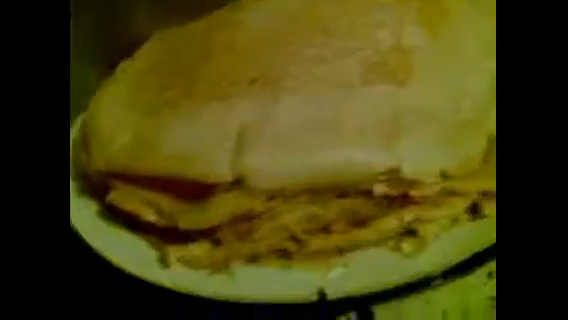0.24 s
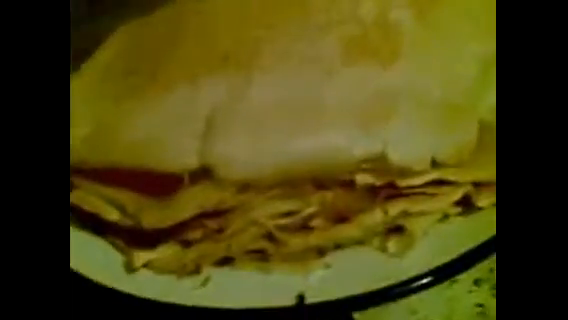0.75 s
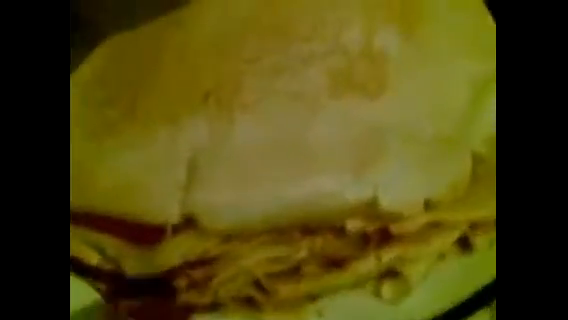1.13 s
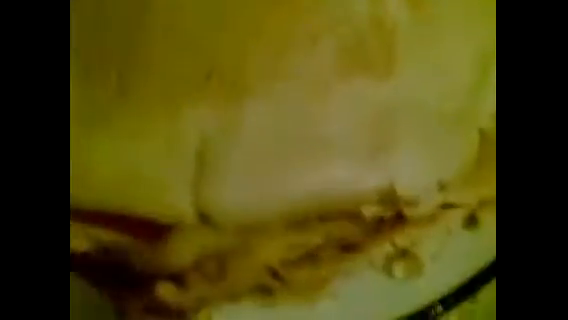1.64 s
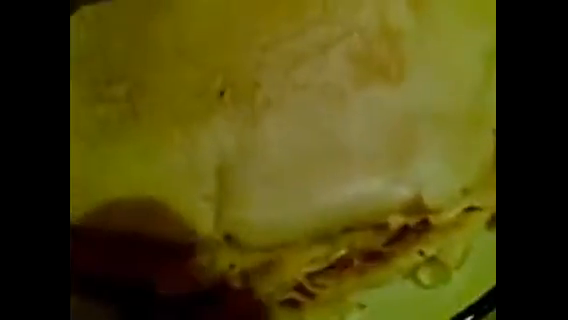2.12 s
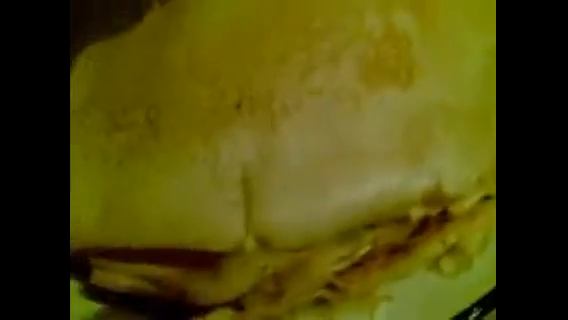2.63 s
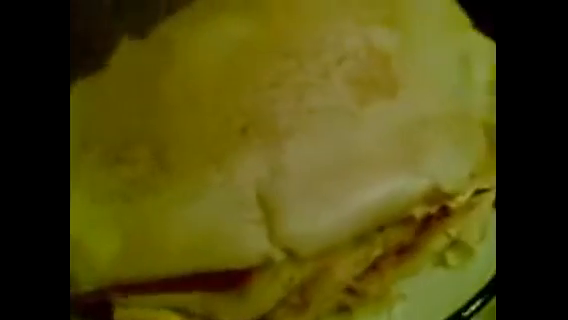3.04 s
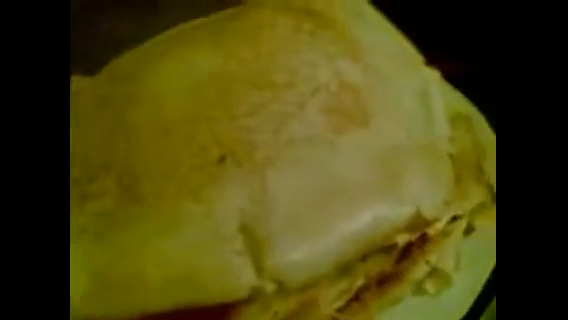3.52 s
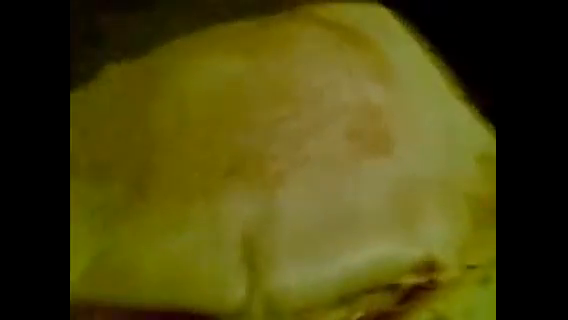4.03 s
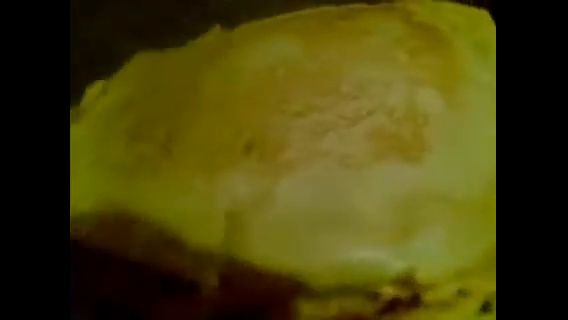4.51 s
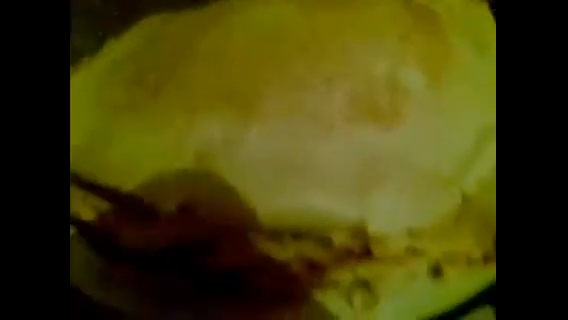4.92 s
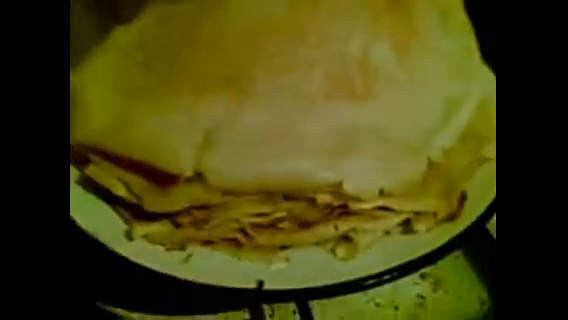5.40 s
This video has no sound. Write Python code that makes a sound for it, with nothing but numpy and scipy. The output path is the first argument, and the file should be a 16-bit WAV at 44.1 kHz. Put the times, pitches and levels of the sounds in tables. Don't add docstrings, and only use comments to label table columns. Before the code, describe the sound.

A dull pan knock, a short silence, then a steady hissing, roaring gas burner with brief utensil scrapes and one fat spit.

```python
import sys
import numpy as np
from scipy import signal
from scipy.fft import rfft, irfft, next_fast_len
from scipy.io import wavfile
from scipy.ndimage import uniform_filter1d

SR = 44100
rng = np.random.default_rng(int(sys.argv[2]) if len(sys.argv) > 2 else 0)


def volts_from_db(level):
    exponent = np.asarray(level, float) / 20
    return 10 ** exponent


def wrap_up_sound(samples):
    columns = np.atleast_2d(samples).T
    tamed = np.clip(columns, -1, 1)
    steps = np.round(tamed * 32767).astype(np.int16)
    wavfile.write(sys.argv[1], SR, steps)


N = 249606

# f/Hz, level/dB, decay time to -60 dB/s
PAN_MODES = [(631, -38.5, 0.32), (700, -47, .15), (1200, -62, .3), (1524, -63.5, 0.37), (909, -66.5, 0.199)]
KNOCK_S = 0.00612
# f/Hz, density/dB
KITCHEN_SPECTRUM = [(18, -48.5), (30, -15), (150, -2), (472, -21), (552, -22), (645, -6.5), (837, -27),
                    (1170, -20.5), (1870, -31), (5170, -42), (15000, -53.5)]
KITCHEN_DB = -42.5
SILENCE_S = (0.0415, 0.2702)

# t/s, turn (-1 nozzle side, +1 whistle side), closeness/dB, height over rim (-1 to +1)
POSE = [(.3, 0.22, -3.5, -0.76), (.57, .06, -0.1, .27), (.84, .19, -1.3, -.12), (1.11, 0.073, -0.4, -0.29),
        (1.38, -0.65, 0.4, .4), (1.65, -0.636, 1.04, 0.94), (1.95, -0.62, 2, -0.65),
        (2.46, -.02, 1.2, -.85), (2.73, 0.054, 0.9, .35), (3.0, .53, 0.5, 0.92), (3.27, .71, 0.6, .05),
        (3.54, 1.07, 0.3, 0.32), (3.81, 1.27, 0.7, -.6), (4.08, 0.0078, 1.4, .87),
        (4.35, -.17, -0.2, -0.11), (4.62, -0.72, -0.2, -.2), (4.89, -0.7, 0.8, -.5),
        (5.12, -0.19, -1.8, 1.05)]
# level/dB, slope per turn/dB, share of closeness, slope per height/dB
TOP_POSE, NOZZLE_POSE = (-44.5, -2.5, 1.21, 0.1), (-51.5, -8.5, 0.4, 0.8)
WHISTLE_POSE, TUBE_POSE = (-53, 5.6, 1.25, 2.5), (-52, -1.2, 0.75, -1.84)
ROAR_POSE, GAP_POSE = (-47.5, 0.7, 0.4734, 0.1), (-54.5, 3.5, 0.45, -1)
LOW_TUBE_POSE = (-49.5, -1.7, -1, 1.5)
RUSH_POSE = (-50.5, 0.25, 0.5, 0.05)

# f/Hz, width/Hz, level/dB
TOP_MODES = [(10230, 940, -1), (11397, 390, -6.5), (12770, 500, -6), (14890, 220, -20)]
# f/Hz, width/Hz, level/dB
WHISTLE_MODES = [(7313, 140, 2.5), (7508, 900, -1)]
# f/Hz, width/Hz, level/dB; the low tube takes its centre from LOW_TUBE_DRIFT
NOZZLE_MODE, HIGH_TUBE_MODE = (9000, 440, 0), (4830, 280, 0)
LOW_TUBE_MODE, PAN_GAP_MODE = (1, 340, 0), (1920, 150, 0)
# t/s, f/Hz
LOW_TUBE_DRIFT = [(.3, 3640), (2.2, 3660), (2.9, 3560), (4.2, 3599), (5.0, 3520), (5.6, 3495)]

# f/Hz, density/dB
ROAR_SPECTRUM = [(12, -45), (20, -12), (64, -0.5), (103, -1), (151, -7.5), (189, -1.5), (222, -5),
                 (252, 0.5), (315, -4), (363, -10), (484, -16.5), (687, -10.5), (900, -17.5), (1170, -23.5),
                 (1980, -120)]
# f/Hz, width/Hz, level/dB
ROOM_MODES = [(57.8, 14.3, 2.5), (245, 11, -0.5), (201.7, 8.2, -1), (396.7, 8.6, -7), (686, 55, -6)]
# f/Hz, density/dB
RUSH_SPECTRUM = [(300, -25), (450, -10.5), (680, -4), (1230, -9.5), (1620, -7.5), (2250, -8), (2850, -11.5),
                 (3600, -6.5), (4250, -3.5), (5860, -5.5), (8200, -4), (12000, -7), (13500, -9.5),
                 (15300, -9.5)]
SIZZLE_S, SIZZLE_SPREAD_S, SIZZLE_DB = 2.92, 0.36, 1.1

# t/s, lower f/Hz, upper f/Hz, level/dB
SIDE_PATCHES = [
    (.75, 14400, 15200, -62),
    (.96, 7600, 9000, -52),
    (1.725, 5700, 7000, -55),
    (1.725, 12400, 13900, -54),
    (4.585, 10300, 11800, -49),
]
# t at peak/s, level/dB, swell time/s, squeak f/Hz, squeak level/dB
SCRAPE_STROKES = [(1.373, -31.5, .035, 1515, -2.5), (1.466, -42.5, 0.016, 1543, -1),
                  (1.95, -55, .024, 1400, -2.5), (2.4, -41.5, 0.018, 4850, 2), (2.89, -45, 0.035, 5100, -2),
                  (2.99, -60, .017, 1300, -4.5), (3.06, -57, .014, 900, -3), (3.74, -52, .023, 1600, -3),
                  (3.82, -58, .017, 1600, -.5), (3.955, -55, .014, 1000, -5),
                  (4.013, -39, 0.017, 4100, -18), (4.17, -52, 0.0153, 1400, 2),
                  (4.245, -46.5, 0.032, 1550, -5), (4.875, -44.5, 0.017, 1540, -3),
                  (4.956, -39, 0.032, 1540, 1.5), (5.003, -41.5, 0.031, 5600, -14)]
FALL_SHARE = 0.72
GRIT_TOP_HZ, GRIT_HZ_PER_DB, GRIT_OVER_SQUEAK_HZ = 6670, 55, 800
PAN_TICK = (2.8635, -23, 3900)  # t/s, level/dB, top f/Hz

# f/Hz, level/dB
GATE_CONTRAST = [(900, -16), (2300, -5.5), (4000, -4.5), (6300, -6.5), (7300, -6.5), (8500, -7),
                 (11000, -2.5), (12200, -5), (13300, -2.5), (14200, -1), (15000, -4)]


def unit(x):
    return x / np.sqrt(np.mean(x ** 2))


def coloured(points, x):
    hz, db = np.transpose(points)
    size = next_fast_len(len(x))
    f = np.maximum(np.arange(size // 2 + 1) * SR / size, 1)
    gain = volts_from_db(np.interp(np.log(f), np.log(hz), db, left=-60, right=-60))
    return irfft(rfft(x, size) * gain, size)[:len(x)]


def band_db(x, lo, hi):
    return 20 * np.log10(np.std(coloured([(lo, 0), (hi, 0)], x)))


def band_pass(x, order, lo, hi):
    return signal.sosfilt(signal.butter(order, [lo, hi], "band", fs=SR, output="sos"), x)


def resonance(x, hz, width_hz):
    return signal.lfilter(*signal.iirpeak(hz, hz / width_hz, SR), x)


def walk(rate):
    steps = np.interp(np.arange(N) * rate / SR, np.arange(2000), rng.standard_normal(2000))
    return 1.3 * uniform_filter1d(steps, int(SR / rate / 2))


def curves(table):
    s, *columns = np.transpose(table)
    return [np.interp(np.arange(N) / SR, s, c) for c in columns]


def heard_db(level_db, turn_db, share, height_db):
    turn, close_db, height = curves(POSE)
    return level_db + turn_db * turn + share * close_db + height_db * height


def singing(modes, flicker_db, waver, shift_hz=0):
    out = 0
    for hz, width, db in modes:
        pole = np.exp(-2 * np.pi * 0.81 * width / SR)
        wander = signal.lfilter([1], [1, -2 * pole, pole ** 2], rng.standard_normal((2, N)))
        centre_hz = hz + shift_hz + waver * width * walk(5)
        phase = 2 * np.pi * np.cumsum(centre_hz) / SR
        tone = unit(wander[0] * np.cos(phase) + wander[1] * np.sin(phase))
        out = out + volts_from_db(db + flicker_db * walk(12)) * tone
    return unit(out)


def knock():
    t = np.arange(N) / SR
    since = np.maximum(t - KNOCK_S, 0)
    ring = sum(volts_from_db(db - 60 * since / t60) * np.sin(2 * np.pi * hz * since) for hz, db, t60 in PAN_MODES)
    onset = 1 - np.exp(-since / 0.002)
    hum = volts_from_db(-49) * np.sin(2 * np.pi * 120 * t + 2.4 * walk(40))
    kitchen = volts_from_db(KITCHEN_DB - 8.5) * unit(coloured(KITCHEN_SPECTRUM, rng.standard_normal(N)))
    return ring * onset + hum + kitchen


def jet():
    top = singing(TOP_MODES, flicker_db=1.3, waver=0.15)
    nozzle = singing([NOZZLE_MODE], flicker_db=0.65, waver=0.25)
    whistle = singing(WHISTLE_MODES, flicker_db=1.48, waver=0.25)
    tube = singing([HIGH_TUBE_MODE], flicker_db=0.5, waver=0.25)
    out = volts_from_db(heard_db(*TOP_POSE) + 0.8) * top
    out = out + volts_from_db(heard_db(*NOZZLE_POSE) + 1.25) * nozzle
    out = out + volts_from_db(heard_db(*WHISTLE_POSE) + 2.5) * whistle
    return out + volts_from_db(heard_db(*TUBE_POSE) + 0.8) * tube


def roar():
    room = sum(volts_from_db(db) * unit(resonance(rng.standard_normal(N), hz, width)) for hz, width, db in ROOM_MODES)
    noise = unit(coloured(ROAR_SPECTRUM, rng.standard_normal(N))) + volts_from_db(-13.5) * room
    return noise * volts_from_db(heard_db(*ROAR_POSE) + 0.1 + 0.59 * walk(9))


def rings():
    gap = singing([PAN_GAP_MODE], flicker_db=1.5, waver=0.12)
    tube = singing([LOW_TUBE_MODE], flicker_db=1.25, waver=0.15, shift_hz=curves(LOW_TUBE_DRIFT)[0])
    return volts_from_db(heard_db(*GAP_POSE) + 0.8) * gap + volts_from_db(heard_db(*LOW_TUBE_POSE) + 0.23) * tube


def rush():
    spitting = rng.standard_normal(N) * volts_from_db(1.46 * rng.exponential(size=N) + 0.63 * walk(24.78))
    hiss = coloured(RUSH_SPECTRUM, spitting)
    sizzle_db = SIZZLE_DB * np.exp(-((np.arange(N) / SR - SIZZLE_S) / SIZZLE_SPREAD_S) ** 2)
    level_db = heard_db(*RUSH_POSE) + sizzle_db - band_db(hiss, lo=5400, hi=6900)
    return volts_from_db(-0.54) * hiss * volts_from_db(level_db)


def flecks():
    out = np.zeros(N)
    swell = np.sin(np.pi * np.arange(2048) / 2048)
    for s, lo, hi, db in SIDE_PATCHES:
        patch = coloured([(lo, 0), (hi, 0)], rng.standard_normal(2048))
        middle = int(s * SR)
        out[middle - 1024:middle + 1024] += volts_from_db(db) * unit(patch) * swell
    return out


def scrapes():
    t, out = np.arange(N) / SR, np.zeros(N)
    slips = rng.standard_normal(N) * volts_from_db(2.0 * rng.exponential(size=N) + 0.8 * walk(200))
    for s, db, rise, hz, squeak_db in SCRAPE_STROKES:
        near = slice(int((s - 0.12) * SR), int((s + 0.12) * SR))
        from_peak = t[near] - s
        span = np.where(from_peak < 0, rise, FALL_SHARE * rise)
        drag = np.exp(-np.abs(from_peak) ** 1.53 / span ** 1.466)
        top_hz = max(GRIT_TOP_HZ + GRIT_HZ_PER_DB * db, hz + GRIT_OVER_SQUEAK_HZ)
        grit = band_pass(slips[near], 4, 880, top_hz)
        squeak = resonance(resonance(slips[near], hz, 380.0), hz, 540.0)
        body = resonance(slips[near], 590.0, 340.0)
        sound = drag * (unit(grit) + volts_from_db(squeak_db - 1.5) * unit(squeak) + volts_from_db(-10.5) * unit(body))
        out[near] += volts_from_db(db + 2.5) * unit(sound) * np.sqrt(np.mean(drag ** 2))
    return out


def pan_tick():
    s, db, top_hz = PAN_TICK
    pop = band_pass(np.arange(N) == int(s * SR), 2, 500, top_hz)
    return volts_from_db(db) * pop / pop.max()


def mute_weak(x):
    f, _, z = signal.stft(x, SR, nperseg=2048)
    power = np.abs(z) ** 2 + 1e-20
    local = uniform_filter1d(uniform_filter1d(power, size=5, axis=0), size=3, axis=1)
    wide = uniform_filter1d(uniform_filter1d(power, size=35, axis=0), size=3, axis=1)
    threshold_db = np.interp(f, *np.transpose(GATE_CONTRAST))[:, None]
    over_db = 10 * np.log10(np.abs(local / wide)) - threshold_db
    kept = 1 / (1 + np.exp(-np.clip(over_db / 0.4, -30, 30)))
    return signal.istft(z * kept, SR, nperseg=2048)[1][:N]


def scene():
    t = np.arange(N) / SR
    silence_from, silence_to = SILENCE_S
    before = knock() * np.clip((silence_from - t) * 2000, 0, 1)
    flame = roar() + rings() + rush()
    stove = mute_weak(jet() + flame + scrapes() + pan_tick()) * (t >= silence_to)
    mono = before + stove
    side = flecks()
    return np.array([mono + side, mono - side])


def band_limit(x):
    return signal.sosfilt(signal.butter(12, 15020, fs=SR, output="sos"), x)


def record(dry):
    return band_limit(dry)


dry = scene()
out = record(dry)
wrap_up_sound(out)
```